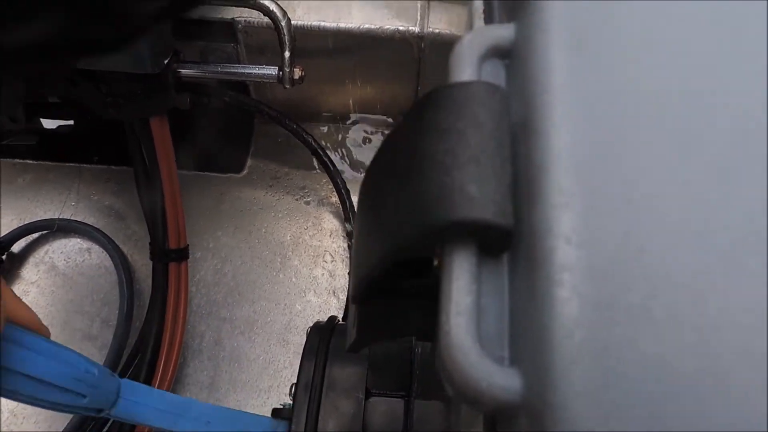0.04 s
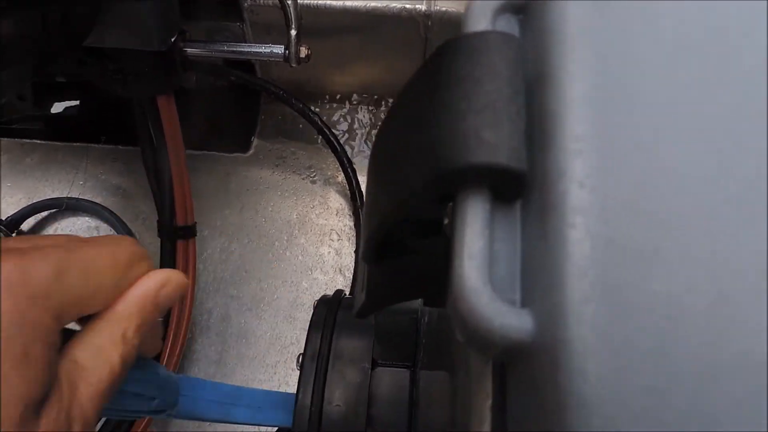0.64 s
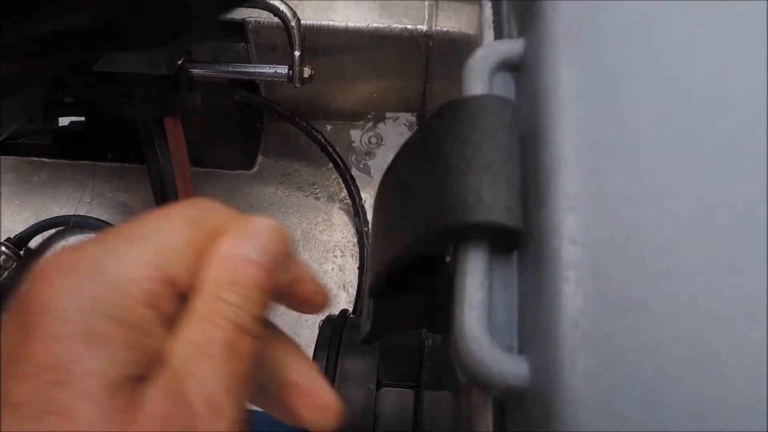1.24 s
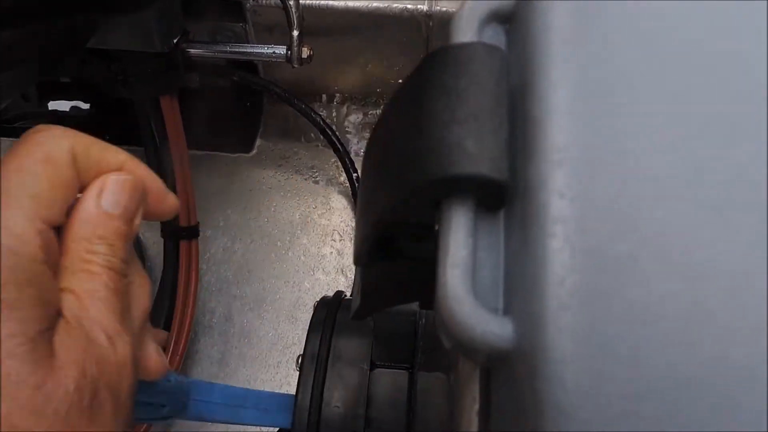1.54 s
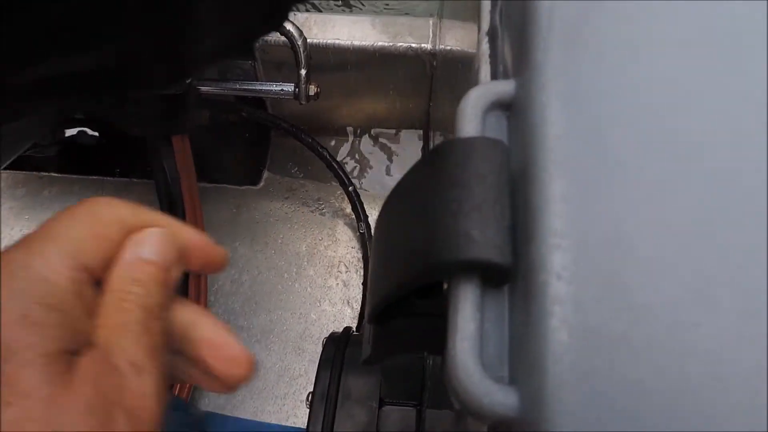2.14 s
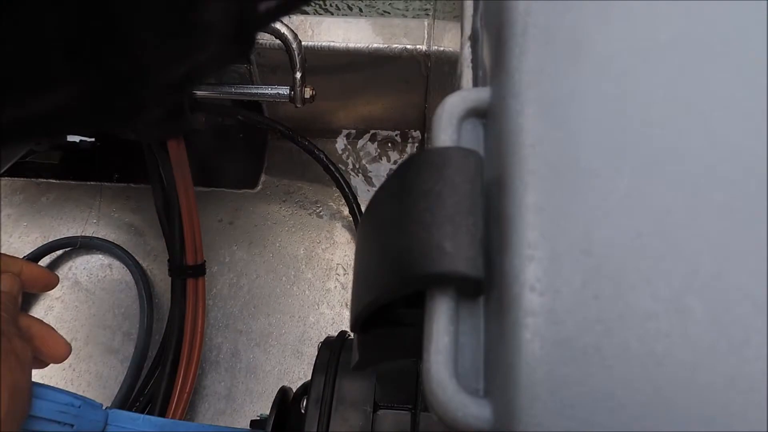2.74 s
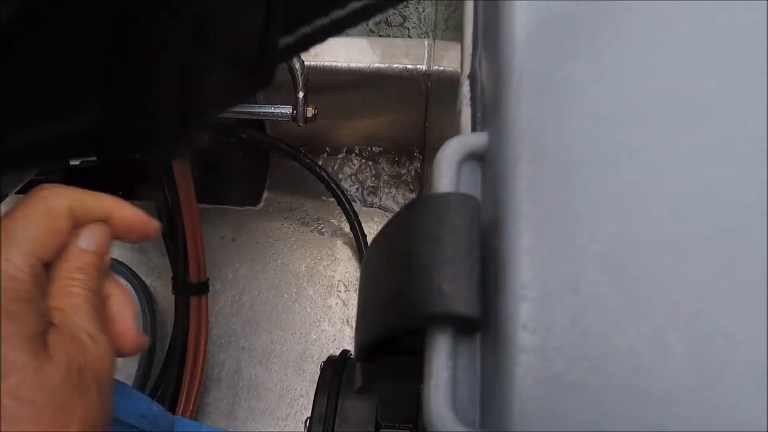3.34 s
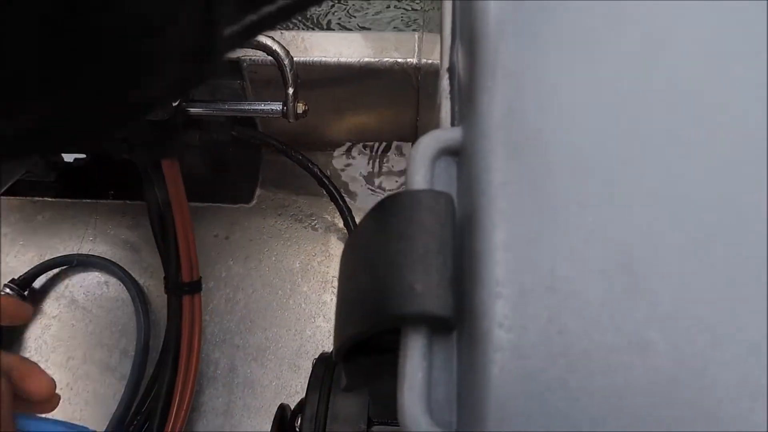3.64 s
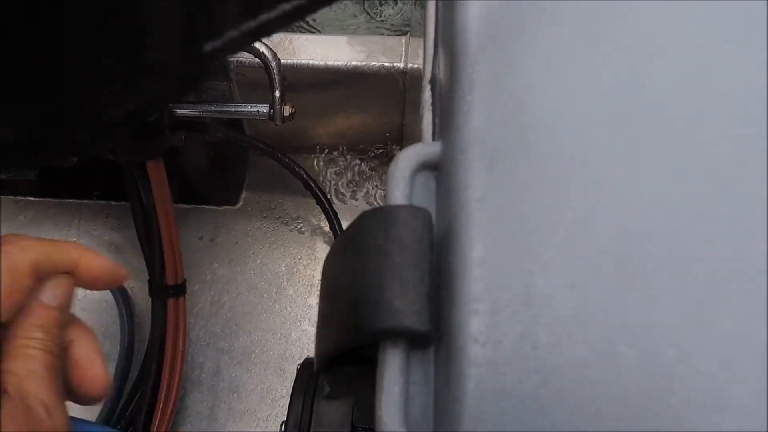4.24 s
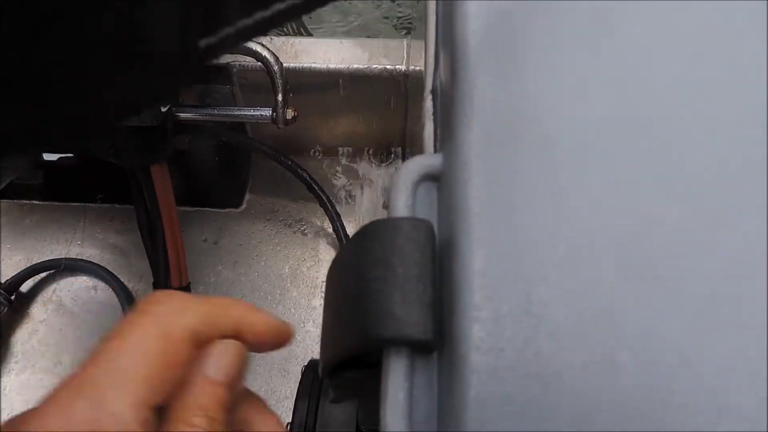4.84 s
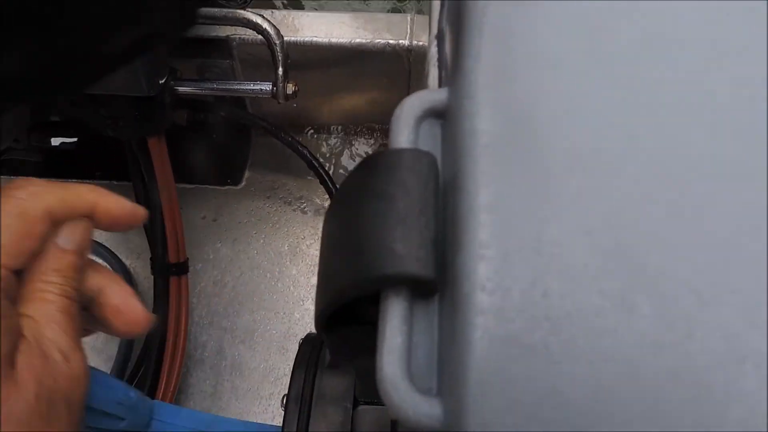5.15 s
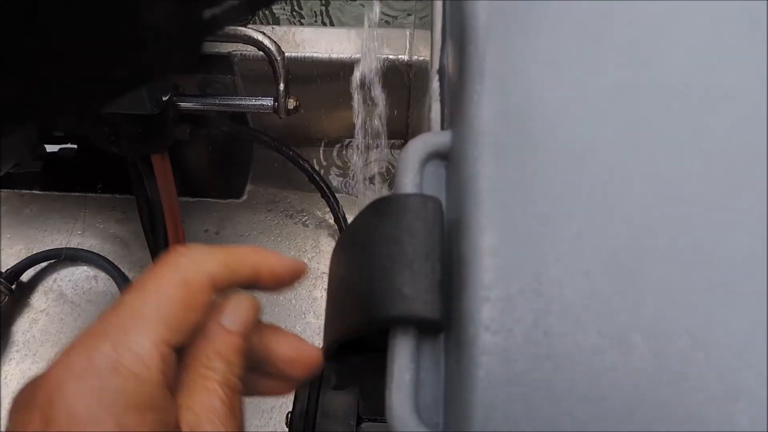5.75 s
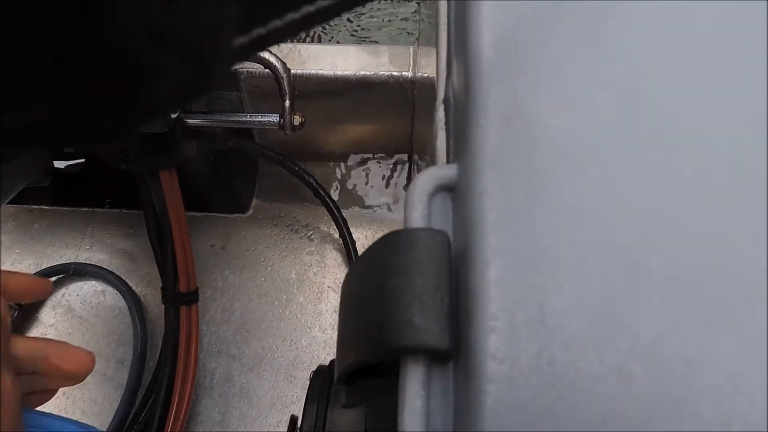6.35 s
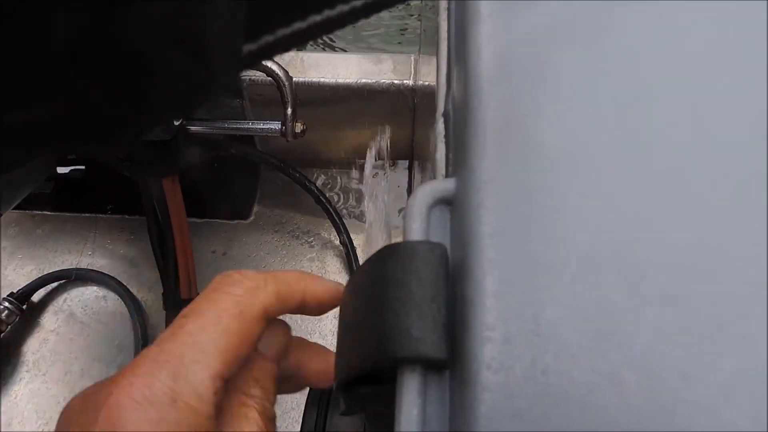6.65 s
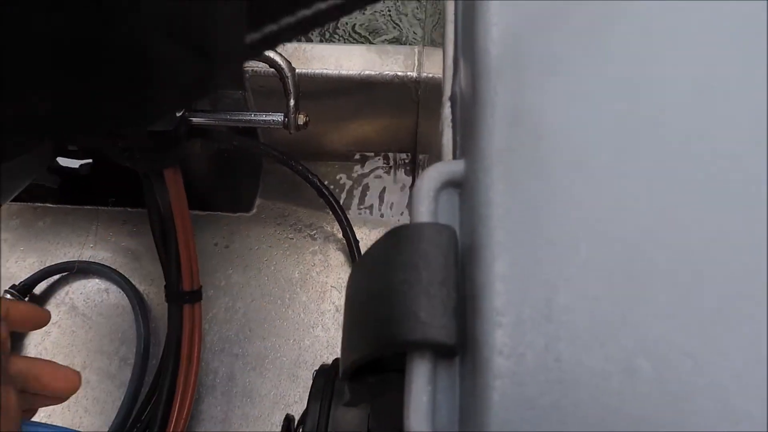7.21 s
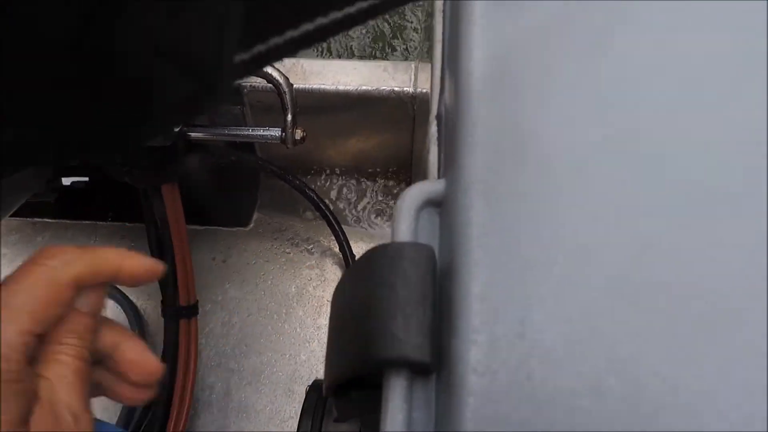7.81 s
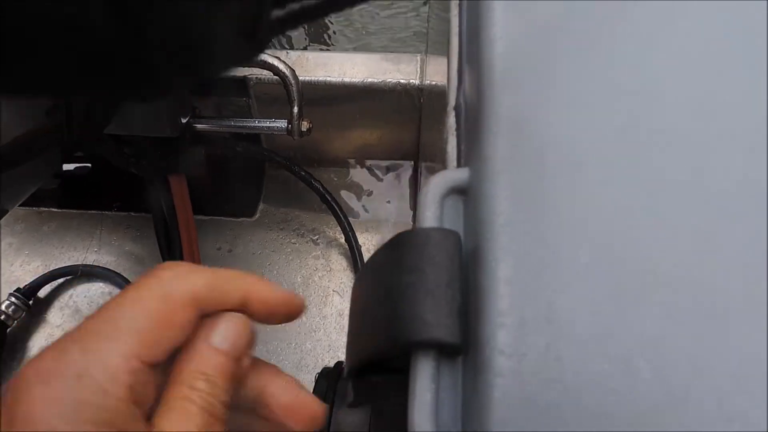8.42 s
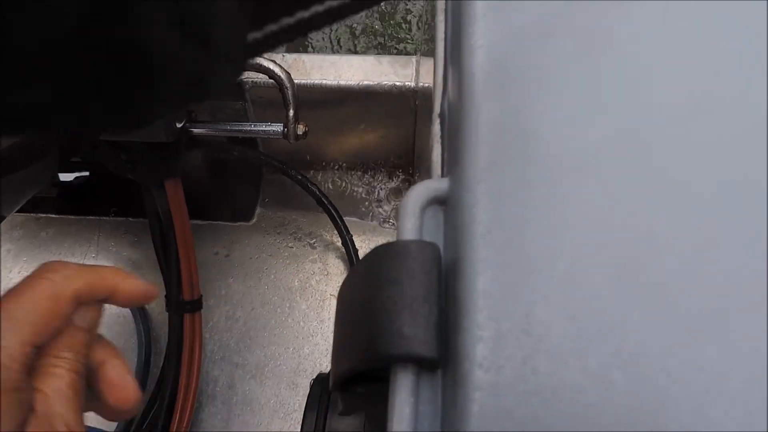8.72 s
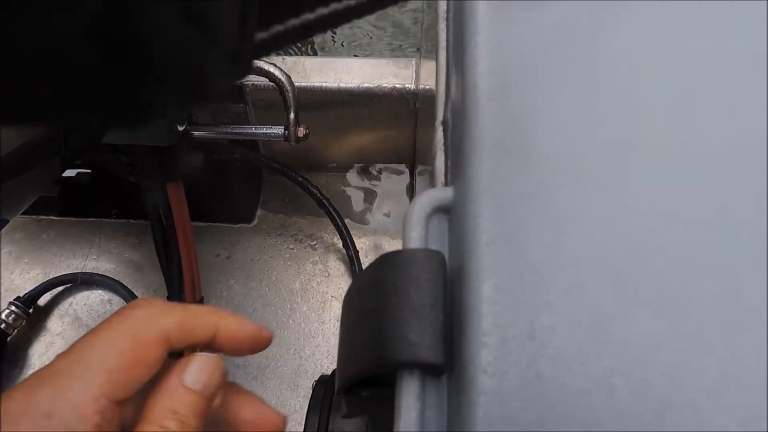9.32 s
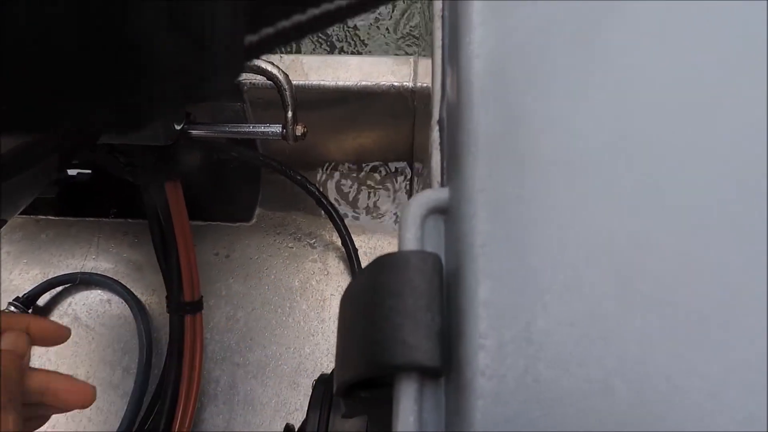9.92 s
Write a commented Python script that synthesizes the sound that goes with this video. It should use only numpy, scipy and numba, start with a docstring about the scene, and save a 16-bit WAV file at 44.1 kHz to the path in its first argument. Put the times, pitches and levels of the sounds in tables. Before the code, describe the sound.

Close up in a small metal boat, a hand pump keeps a steady rhythm of about eleven strokes out and back. A wet, sputtering spurt alternates with an airy slurp and a soft hollow knock, with a scratchy rasp in both directions. The valve slaps on some strokes and water thuds in the hose. Light bubbling and quiet lapping fill the short gaps.

```python
"""In a small aluminium boat, a hand bilge pump is worked to and fro, about one cycle a second.
Each push sputters water and air through the resonances of the hose; each pull slurps at the intake.
Friction makes the moving parts rasp both ways. The outlet valve slaps, and slugs of water thud in
the hose and hull. The expelled water patters into the stern well as ringing bubbles,
over a soft lapping round the hull."""
import sys
import numpy as np
from scipy import signal
from scipy.fft import rfft, irfft, next_fast_len
from scipy.io import wavfile
from scipy.ndimage import uniform_filter1d, map_coordinates
from numba import njit

SR = 44100
rng = np.random.default_rng(int(sys.argv[2]) if len(sys.argv) > 2 else 0)


def generate_wav(signal):
    """Clip the signal to [-1, 1] and save it as 16-bit WAV at the path in sys.argv[1]."""
    frames = np.transpose(np.atleast_2d(signal))
    scaled = np.clip(frames, -1, 1) * 32767
    pcm = np.round(scaled).astype(np.int16)
    wavfile.write(sys.argv[1], SR, pcm)


N = 439677
TIME = np.arange(N) / SR
GRIP_S = 0.0028   # the handle takes up its load

# A push opens the outlet, flows steadily, crests as the arm bears down, and closes. Levels are relative.
# start_s, crest_s, end_s, crest_half_width_s, steady_db, crest_db, squeeze_db, swell_db_per_s
PUSHES = [(0.119, 0.351, 0.531, 0.063, -36, -35.5, -49.5, -65),
          (1.135, 1.403, 1.53, 0.028, -40.5, -32.5, -52, 18.5),
          (2.038, 2.332, 2.46, 0.03, -36.5, -34, -51.5, 5),
          (2.945, 3.194, 3.312, 0.031, -37.5, -36, -50, 2.5), (3.826, 4.086, 4.21, 0.038, -35, -31, -46, 4),
          (4.705, 5.007, 5.12, 0.044, -38.5, -37.5, -52.5, -23),
          (5.62, 5.87, 5.985, 0.031, -33, -42, -45, -10), (6.491, 6.778, 6.885, 0.029, -41, -37, -52.5, 32),
          (7.383, 7.655, 7.76, 0.035, -41, -34.5, -51, -6),
          (8.279, 8.567, 8.67, 0.037, -37.5, -29.5, -46.5, -9),
          (9.178, 9.504, 9.64, 0.051, -43, -34, -51, -20)]
# The outlet valve shuts near the end of a push: start_s, level_db
SLAPS = [(0.4399, -24.5), (2.3915, -21), (3.2774, -29.5), (4.143, -18), (5.1018, -37), (5.9224, -20),
         (8.6408, -24)]


def from_db(db):
    """Decibels to amplitude ratio."""
    return 10 ** (np.asarray(db) / 20)


def rms_one(x):
    """Normalisation to unit rms."""
    return x / np.sqrt(np.mean(x ** 2) + 1e-20)


def ease(share):
    """Raised-cosine step from 0 to 1."""
    return np.sin(np.pi / 2 * np.clip(share, 0, 1)) ** 2


def hump(t, centre_s, width_s):
    """Gaussian pulse of height 1."""
    return np.exp(-((t - centre_s) / width_s) ** 2)


def cut(x, hz, kind, order=2):
    """Butterworth low- or high-pass."""
    return signal.sosfilt(signal.butter(order, min(hz, .45 * SR), kind, fs=SR, output="sos"), x + 1e-18)


def tint(x, spectrum, share=1):
    """Zero-phase filtering by a smooth spectrum, or a share of its dB."""
    hz, db = np.transpose(spectrum)
    size = next_fast_len(N)
    bins_hz = np.arange(size // 2 + 1) * SR / size + 1
    response = from_db(share * np.interp(np.log(bins_hz), np.log(hz), db))
    return irfft(rfft(x, size) * response, size)[:N]


def drift(rate_hz):
    """Slow random modulation: low-passed noise of unit rms."""
    step = 16
    slow = cut(rng.standard_normal((N + SR) // step + 2), rate_hz * step, "low")[SR // step:]
    return np.interp(np.arange(N) / step, np.arange(len(slow)), rms_one(slow))


def grains(per_s, spread_db):
    """Shot noise: random impulses of uneven size and sign."""
    sizes = from_db(spread_db * np.minimum(rng.exponential(1, N), 4)) * rng.choice([-1, 1], N)
    return rms_one(sizes * (rng.random(N) < per_s / SR))


def resonate(x, modes):
    """Modal superposition: damped resonators in parallel, alternating in sign."""
    out = 0
    for k, (hz, width_hz, db) in enumerate(modes):
        r = np.exp(-np.pi * width_hz / SR)
        poles = [1, -2 * r * np.cos(2 * np.pi * hz / SR), r * r]
        ring = signal.lfilter([1, 0, -1], poles, x + 1e-18) * (1 - r * r) / 2
        out = out + (-1) ** k * from_db(db) * ring
    return out


@njit
def glide(x, hz, width_hz):
    """A damped resonator whose natural frequency varies in time."""
    angle = 2 * np.pi * hz / SR
    r = np.exp(-np.pi * width_hz / SR)
    y = np.zeros(len(x))
    for i in range(2, len(x)):
        y[i] = x[i] - x[i - 2] + 2 * r * np.cos(angle[i]) * y[i - 1] - r * r * y[i - 2]
    return y


def blows(events, modes, spatter_s, spatter_db):
    """Impact excitation: an impulse and a short wet spatter ring the modes."""
    out, age = np.zeros(N + SR), TIME[:SR // 2]
    for s, db in events:
        force = from_db(spatter_db) * rng.standard_normal(len(age)) * np.exp(-age / spatter_s)
        force[0] += 1
        hit = resonate(force, modes)
        out[int(s * SR):][:len(age)] += from_db(db) * hit / np.abs(hit).max()
    return out[:N]


def bubbles(rows, cycles, rise):
    """Each bubble (start_s, pitch_hz, gain) is a damped oscillator of rising pitch."""
    out = np.zeros(N + SR)
    for s, hz, gain in rows:
        life = np.arange(0, 3, hz / (cycles * SR))
        envelope = (1 - np.exp(-10 * life)) * np.exp(-2 * life)
        tone = np.sin(2 * np.pi * cycles * life * (1 + rise * life))
        out[int(s * SR):][:len(life)] += 2 * gain * envelope * tone
    return out[:N]


def walls(x, echo_s):
    """Convolution with dense early reflections off the close metal walls."""
    age = TIME[:SR // 25]
    echoes = rng.standard_normal(len(age)) * np.exp(-age / echo_s) * (age > .002)
    return signal.oaconvolve(x, echoes / np.linalg.norm(echoes))[:N]


def shifting(x, echo_s, rate_hz):
    """Reflection paths change as water and hand move: a slow blend of three sets."""
    weights = np.array([drift(rate_hz) for _ in range(3)])
    return sum(w * walls(x, echo_s) for w in weights / np.linalg.norm(weights, axis=0))


def lapping(friction):
    """Modulated noise: water round the hull is stirred by each stroke and settles in the pauses."""
    # Spectrum of the lapping: frequency_hz, level_db
    spectrum = [(20, 1.5), (45, -12.5), (72, 4.5), (170, -5), (400, -16.5), (950, -5.5), (1200, -15),
                (1750, -13.5), (3000, -20), (15000, -30)]
    mid, side = [rms_one(tint(rng.standard_normal(N), spectrum)) for _ in range(2)]
    side = cut(side, 1500, "high", order=1) + from_db(-10) * side
    stirred = rms_one(cut(friction, 11, "low", order=1))
    water = (from_db(-62) + from_db(-58.5) * stirred) * np.array([mid + side, mid - side])
    slop = cut(water, 1020, "low") * from_db(4.2 * drift(14))   # swells and sinks with the ripples
    return slop - cut(water, 990, "high")


def pushing():
    """Displacement flow sets the envelopes of water, air and friction in each push."""
    open_s, water_stop_s, air_stop_s, rasp_stop_s = 0.159, 0.092, 0.061, 0.052
    gains = np.zeros((3, N))
    for start, crest_s, end, width_s, steady_db, crest_db, squeeze_db, swell_db_per_s in PUSHES:
        during = (TIME > start) & (TIME < end)
        t = TIME[during]
        age, left_s = t - start, end - t
        steady = from_db(steady_db + swell_db_per_s * (age - open_s)) * ease(age / open_s + 0.11)
        crest = from_db(crest_db) * hump(t, crest_s, width_s)
        diaphragm_fold = hump(age, centre_s=0.038, width_s=0.036)
        handle_tick = from_db(-4) * np.exp(-age / 0.006)
        squeeze = from_db(squeeze_db) * (diaphragm_fold + handle_tick)
        air_ratio = from_db(-3.5 + 11 * age)   # more air as the chamber empties
        water = (steady + crest) * ease(left_s / water_stop_s)
        air = (steady * air_ratio + crest) * ease(left_s / air_stop_s)
        friction = (steady * from_db(-11) + crest * from_db(-7) + squeeze) * ease(left_s / rasp_stop_s)
        gains[:, during] += ease(age / GRIP_S) * np.array([water, air, friction])
    return gains


def rasp(friction):
    """Wet friction makes fine impulses, coloured by the nearest walls, and a wandering squelch."""
    # Spectrum of the rasp: frequency_hz, level_db
    spectrum = [(1500, -4.5), (3500, -4), (4300, 1), (4750, 1), (5150, -2.5), (6500, -1), (8700, -0.5),
                (10500, 2.5), (12000, 4), (13500, 2.5), (15700, -8)]
    gain = friction * from_db(0.56 * drift(200) + 1.83 * drift(18))
    scrapes = [shifting(grains(14000, spread_db=1.5), echo_s=0.0034, rate_hz=2) for _ in range(2)]
    mid, side = [rms_one(tint(scrape, spectrum)) for scrape in scrapes]
    squelch_hz = 5600 * np.exp(0.14 * drift(9.2))
    squelch = glide(grains(3000, spread_db=-5), squelch_hz, width_hz=300)
    mid = mid + from_db(-10) * rms_one(squelch * from_db(2.2 * drift(23)))
    return from_db(-0.28) * gain * np.array([mid + side, mid - side])


def spurt(water_gain, air_gain):
    """Bursts of air through water excite the hose and an air pocket, whose pitch falls as it grows."""
    # Resonances of the outlet hose: pitch_hz, width_hz, level_db
    hose_modes = [(488.7, 43, -4.5), (709, 83, -2.5), (872, 48, -1.5), (996, 65, -1), (1383, 66, -1.5),
                  (1530, 97, -6), (1741, 42, -1)]
    # Resonances of the air jet: pitch_hz, width_hz, level_db
    jet_modes = [(2062, 140, 3.5), (2530, 240, -3), (2880, 72, 1), (3490, 69, -1.5)]
    # The air pocket as a push ends: before_end_s, pitch_hz
    pocket_track = [(.045, 1980), (.08, 2150), (.1, 2650), (.125, 2837)]
    sputter = from_db(2.05 * drift(180) + 1.2 * drift(12.6))
    churn = sputter * grains(3000, spread_db=-0.5)
    water = resonate(churn + from_db(-1.5) * shifting(churn, echo_s=0.009, rate_hz=4.05), hose_modes)
    water = rms_one(cut(cut(water, 400, "high"), 1700, "low"))
    ends = np.array(PUSHES)[:, 2]
    push_index = np.minimum(np.searchsorted(ends + .1, TIME), len(ends) - 1)
    pocket_hz = np.interp(ends[push_index] - TIME, *np.transpose(pocket_track)) * (1 + 0.036 * drift(40))
    pocket = glide(sputter * grains(3000, spread_db=2), pocket_hz, width_hz=190)
    jet = resonate(sputter * grains(4000, spread_db=3.5), jet_modes)
    air = rms_one(jet) + from_db(3.5) * rms_one(pocket)
    air = rms_one(cut(cut(air, 3470, "low", order=4), 940, "high"))
    return from_db(1.12) * water_gain * water + from_db(2) * air_gain * air


def surge(water_gain, suction):
    """Forced vibration: moving water and the diaphragm drum on the pump body and hull."""
    # Modes of pump body and hull: pitch_hz, width_hz, level_db
    hull_modes = [(69.2, 6.2, 5), (117, 28.3, -3.5), (151, 17.8, 0.5), (285.3, 77, -6.5)]
    # Surges in the hose during a push: start_s, level_db
    hose_surges = [(0.18, -29), (1.405, -36), (2.32, -26), (3.055, -33.5), (4.09, -22), (4.845, -33),
                   (5.695, -24.5), (6.635, -32), (7.63, -27), (8.57, -25), (9.29, -30.5)]
    # The diaphragm's hollow knock as the chamber fills: start_s, level_db
    diaphragm_knocks = [(0.975, -36.5), (1.88, -38), (2.755, -34), (3.605, -28), (5.335, -39),
                        (5.435, -29.5), (6.32, -36), (7.17, -35.5), (8.06, -32), (8.885, -35),
                        (8.985, -28.5), (9.92, -33)]
    flow = from_db(-10) * water_gain + from_db(-30) * suction + from_db(-58)
    drumming = rms_one(resonate(grains(600, spread_db=2) * flow, hull_modes)) * np.sqrt(np.mean(flow ** 2))
    thuds = from_db(1.5) * blows(hose_surges, hull_modes[1:], spatter_s=0.031, spatter_db=-16)
    knocks = from_db(2.5) * blows(diaphragm_knocks, hull_modes[:3], spatter_s=0.037, spatter_db=-20)
    return cut(cut(drumming + thuds + knocks, 41, "high"), 1030, "low")


def water_slugs():
    """Slugs of water strike the hose end and excite its heavily damped modes."""
    # Impacts: start_s, level_db
    impacts = [(0.184, -18.5), (0.429, -27.5), (0.482, -35.5), (2.39, -29), (3.184, -47), (4.089, -20.5),
               (4.848, -21.5), (5.696, -20), (5.922, -28), (6.638, -28), (9.294, -22)]
    # Modes of the hose end: pitch_hz, width_hz, level_db
    modes = [(212, 190, -5), (580, 370, -6.5), (850, 280, 1.5)]
    return from_db(6) * cut(blows(impacts, modes, spatter_s=0.0062, spatter_db=-24), 2000, "low")


def valve_closing(water, air):
    """Throttling: the valve chokes the flow just before each slap, and spits after it."""
    choke, spit = np.ones(N), np.zeros(N)
    for s, db in SLAPS:
        near = np.abs(TIME - s) < .1
        age = TIME[near] - s
        choke[near] -= 0.38 * hump(age, centre_s=-0.008, width_s=0.02)
        spit[near] += from_db(db) * (age > 0) * np.exp(-np.abs(age) / 0.0086)
    return water * choke + from_db(-12) * spit, air * choke + from_db(-9.5) * spit


def valve_slaps():
    """The impact of closing rings the valve flap briefly."""
    # Modes of the flap: pitch_hz, width_hz, level_db
    modes = [(895, 360, 4), (1980, 140, 2), (2700, 640, 0)]
    return from_db(-3) * blows(SLAPS, modes, spatter_s=0.0027, spatter_db=-15)


def patter(water_gain, flight_s=0.41, per_s=260, low_hz=267, high_hz=2340):
    """Air entrainment: the spurt falls into the well and raises a soft wash of bubbles."""
    fall = np.interp(TIME - flight_s, TIME, uniform_filter1d(water_gain, SR // 4))
    level = from_db(-24) * fall + from_db(-55)
    when, height, strength = rng.random((int(per_s * N / SR), 3)).T
    pitch_hz = low_hz * (high_hz / low_hz) ** height
    gain = level[(when * N).astype(int)] * strength ** 2
    return bubbles(zip(when * N / SR, pitch_hz, gain), cycles=4.1, rise=0.045)


def rubbing():
    """Friction envelope of the handle between strokes: a quick grip, then a fade."""
    # Brief rubs: start_s, length_s, level_db
    rubs = [(0.566, 0.031, -57), (0.609, .04, -61), (1.986, 0.016, -56), (2.873, 0.025, -55),
            (2.922, 0.014, -51), (3.332, .025, -58), (4.215, .03, -64), (4.62, .05, -65),
            (7.776, 0.014, -64.5), (9.097, 0.022, -54)]
    gain, age = np.zeros(N + SR), TIME[:SR // 2]
    for s, length_s, db in rubs:
        gain[int(s * SR):][:len(age)] += from_db(db) * ease(age / GRIP_S) * hump(age, 0, length_s)
    return gain[:N]


def air_pops():
    """Single bubbles oscillate freely in the chamber and hose as they refill."""
    # Bubbles: start_s, pitch_hz, level_db
    pops = [(0.573, 2330, -40), (1.6407, 2090, -39), (1.6706, 2100, -38), (2.598, 2160, -26),
            (5.971, 292, -41.5), (6.923, 2060, -44), (7.013, 2200, -35), (7.021, 2110, -31.5),
            (7.772, 264, -38), (9.7623, 2390, -34)]
    return bubbles([(s, hz, from_db(db)) for s, hz, db in pops], cycles=9.6, rise=0.018)


def pulling():
    """Envelopes of suction and friction: each pull draws gently, then crests as the intake sucks air."""
    # Pulls: start_s, crest_s, end_s, crest_half_width_s, steady_db, slurp_db, rasp_db
    pulls = [(0.741, 0.942, 1.036, 0.072, -48.5, -33, -51), (1.583, 1.833, 1.955, 0.054, -56, -37.5, -50),
             (2.487, 2.756, 2.828, 0.07, -51.5, -36, -48.5), (3.361, 3.628, 3.715, 0.067, -53, -38.5, -48),
             (4.275, 4.496, 4.63, 0.066, -53, -36, -47.5),
             (5.161, 5.426, 5.516, 0.071, -55.5, -36.5, -45.5),
             (6.003, 6.288, 6.41, 0.071, -57, -36, -45.5), (6.928, 7.166, 7.262, 0.057, -51.5, -33.5, -44),
             (7.794, 8.049, 8.163, 0.055, -57, -37, -46.5), (8.72, 8.974, 9.06, 0.068, -54, -36, -46),
             (9.696, 9.908, 9.99, 0.066, -50.5, -38.5, -46)]
    rise_s, stop_s = 0.061, 0.074
    gains = np.zeros((2, N))
    for start, crest_s, end, width_s, steady_db, slurp_db, rasp_db in pulls:
        during = (TIME > start) & (TIME < end)
        t = TIME[during]
        suction = from_db(steady_db - 4.5) + from_db(slurp_db) * hump(t, crest_s, width_s)
        friction = from_db(steady_db) + from_db(rasp_db) * hump(t, crest_s, 1.19 * width_s)
        tug = ease((t - start) / GRIP_S) * ease((t - start) / rise_s + 0.36)
        gains[:, during] += tug * ease((end - t) / stop_s) * np.array([suction, friction])
    return gains


def slurp(suction):
    """Two-phase flow: a froth of air and water excites the intake and a wandering air gap."""
    # Resonances of the intake: pitch_hz, width_hz, level_db
    modes = [(730, 79, 1.1), (1012, 83, 3.5), (1517, 135, 6.6), (1855, 56, 8.3), (2080, 49, 6.5),
             (2377, 98, 9.8), (2635, 330, 5.2), (3720, 860, 0.66)]
    flutter = from_db(1.83 * drift(170) + 1.9 * drift(14))
    froth = resonate(grains(5000, spread_db=-0.5) * flutter, modes)
    froth = rms_one(cut(froth, 3870, "low", order=3))
    gap_hz = 2250 * np.exp(0.1 * drift(11.8))
    gap = glide(grains(3000, spread_db=1) * flutter, gap_hz, width_hz=200)
    return suction * (from_db(1.1) * froth + from_db(-3) * rms_one(cut(gap, 3800, "low")))


def gurgle(half_length_s=0.034, rise_per_s=1.53):
    """Cavity resonance: air gulped back into the hose stirs two modes that rise as it fills."""
    # Gulps after a push: start_s, level_db
    gulps = [(1.622, -48.5), (2.551, -49), (3.409, -47.5), (4.219, -51), (4.342, -47.5), (5.257, -46.5),
             (6.138, -47), (6.989, -44.5), (7.88, -49), (8.779, -50.5), (9.745, -45)]
    # Modes of the air in the hose: pitch_hz, width_hz, level_db
    modes = [(333, 23, -1.5), (658, 44, -2)]
    gain, pitch_ratio = np.zeros(N), np.ones(N)
    for s, db in gulps:
        near = np.abs(TIME - s - half_length_s) < 2 * half_length_s
        age = TIME[near] - s
        gain[near] += from_db(db) * hump(age, half_length_s, half_length_s)
        pitch_ratio[near] = rng.uniform(0.885, 1.102) * (1 + rise_per_s * age)
    rings = [from_db(db) * rms_one(glide(grains(900, spread_db=2), hz * pitch_ratio, width_hz))
             for hz, width_hz, db in modes]
    return from_db(-2.5) * gain * cut(sum(rings), 1130, "low")


def in_boat(x, echo_s, mono_below_hz, side_db, lag_s=.00008):
    """Reflections decorrelate the upper range; the direct sound reaches the left first."""
    side = from_db(side_db) * cut(shifting(x, echo_s, rate_hz=2.07), mono_below_hz, "high")
    later = map_coordinates(x, [np.arange(N) - lag_s * SR], order=3)
    return np.array([x + side, later - side])


def scene():
    """Superposition of outlet, intake, friction and lapping, all following the strokes."""
    water, air, push_friction = pushing()
    water, air = valve_closing(water, air)
    suction, pull_friction = pulling()
    friction = push_friction + from_db(0.05) * pull_friction + rubbing()
    impacts = valve_slaps() + water_slugs()
    outflow = spurt(water, air) + impacts + surge(water, suction) + patter(water) + gurgle()
    outlet = in_boat(outflow, echo_s=0.0058, mono_below_hz=1030, side_db=-7)
    intake = in_boat(slurp(suction) + air_pops(), echo_s=0.0057, mono_below_hz=930, side_db=-9)
    return outlet + intake + rasp(friction) + lapping(friction)


def record(dry):
    """Frequency response: each microphone has its own colour, and the top is cut steeply."""
    # Imbalance of the two microphones: frequency_hz, left_minus_right_db
    imbalance = [(600, 0.5), (1000, 1.5), (1450, 3.5), (1750, 3), (2100, -7.5), (2500, -4), (2900, 1.5),
                 (4200, 5.5), (6700, 6), (10000, 1.5), (12000, 5.5), (13300, 5.5), (14500, 14.5)]
    cutoff_hz = 15700
    heard = np.array([tint(dry[0], imbalance, share=0.54), tint(dry[1], imbalance, share=-0.45)])
    return signal.sosfilt(signal.ellip(12, .1, 80, cutoff_hz, fs=SR, output="sos"), heard)


dry = scene()
out = record(dry)
generate_wav(out)
```